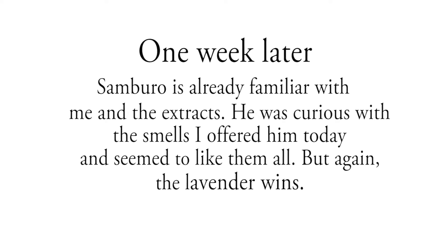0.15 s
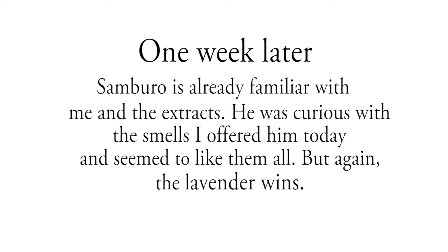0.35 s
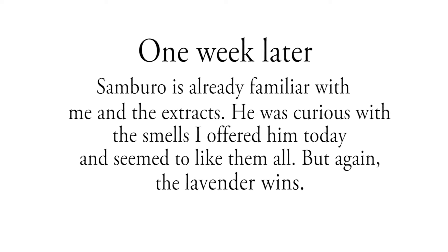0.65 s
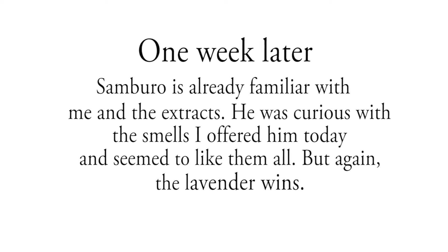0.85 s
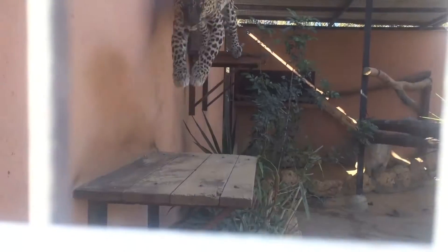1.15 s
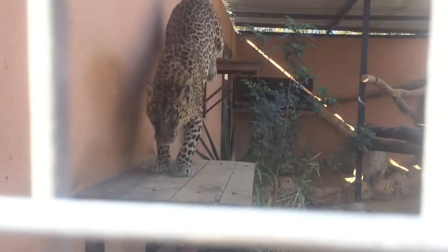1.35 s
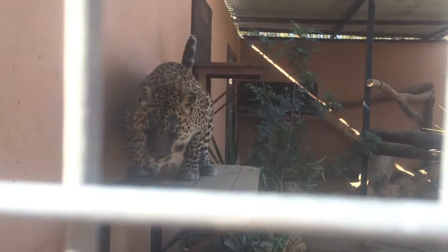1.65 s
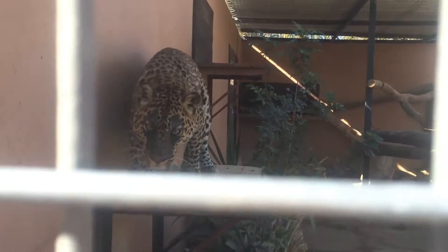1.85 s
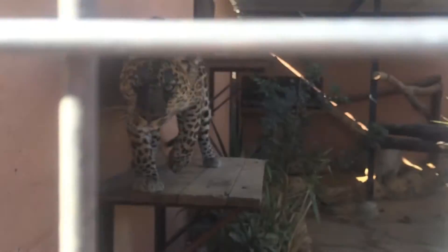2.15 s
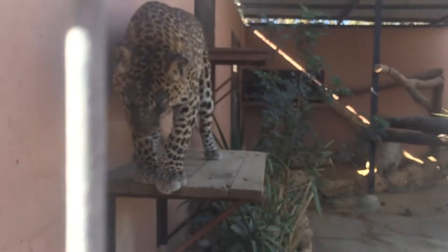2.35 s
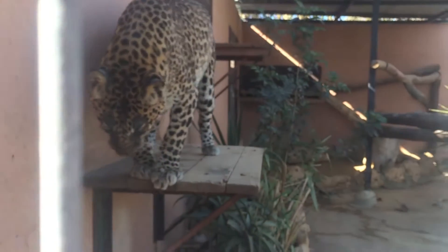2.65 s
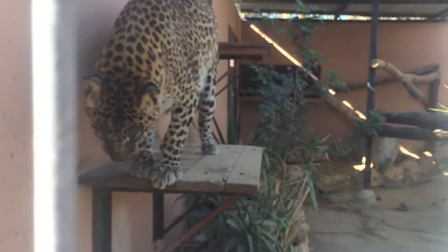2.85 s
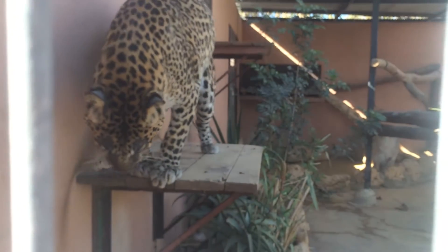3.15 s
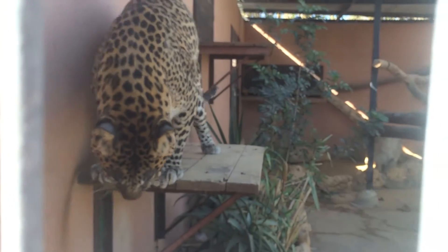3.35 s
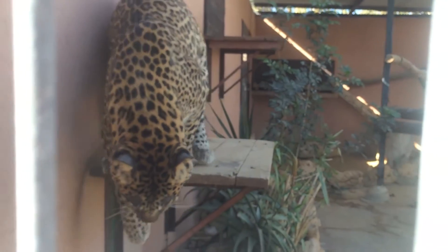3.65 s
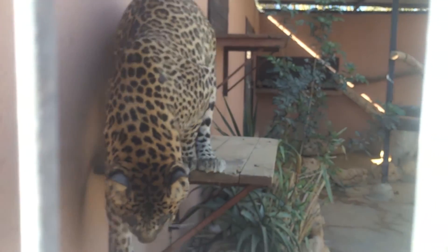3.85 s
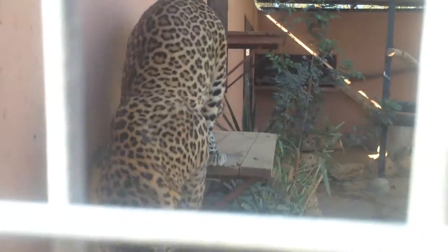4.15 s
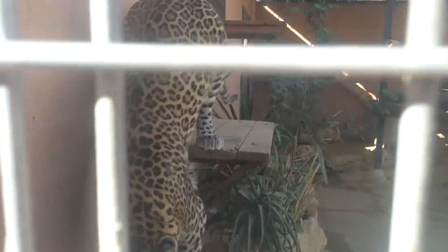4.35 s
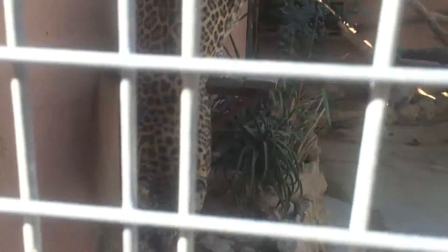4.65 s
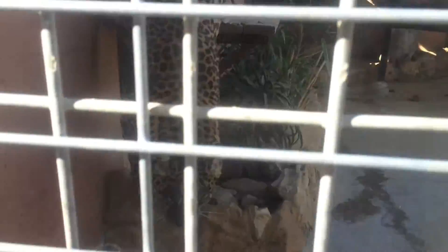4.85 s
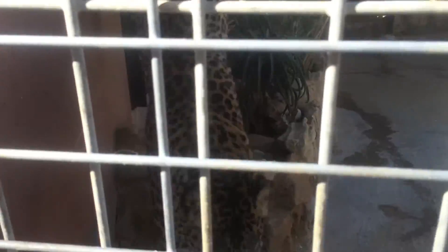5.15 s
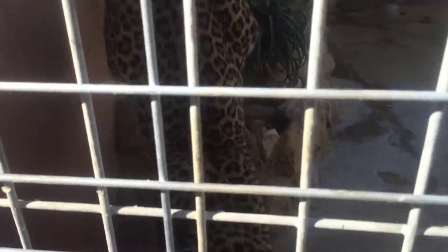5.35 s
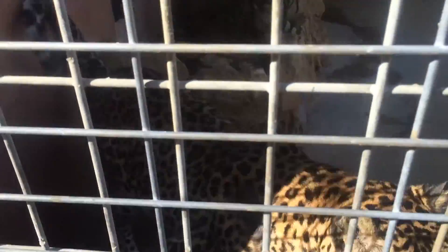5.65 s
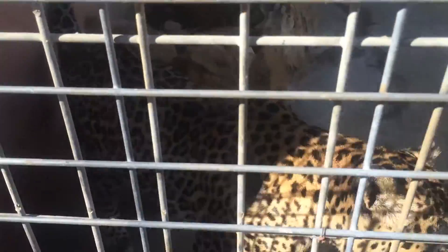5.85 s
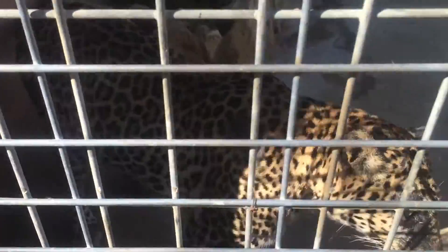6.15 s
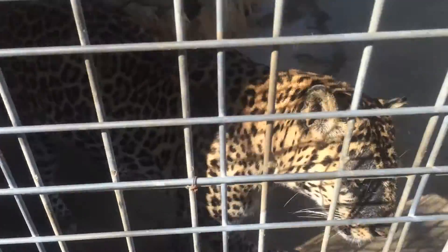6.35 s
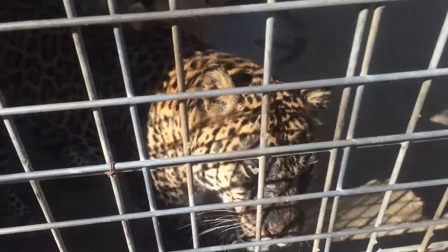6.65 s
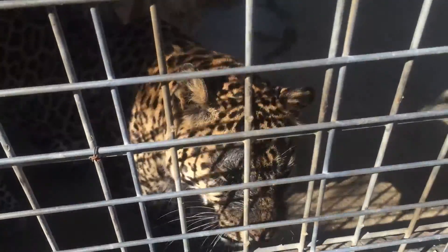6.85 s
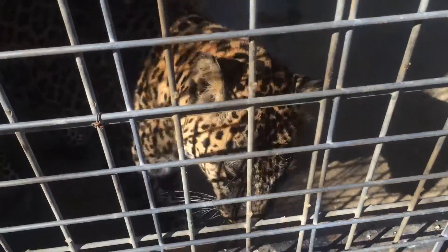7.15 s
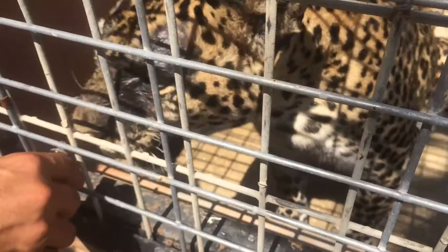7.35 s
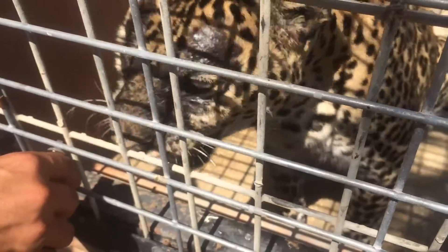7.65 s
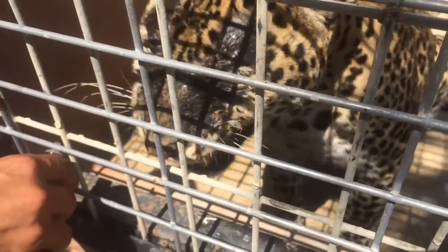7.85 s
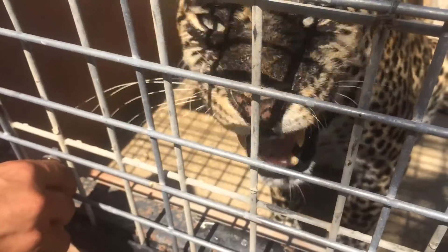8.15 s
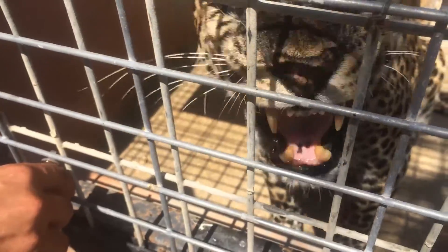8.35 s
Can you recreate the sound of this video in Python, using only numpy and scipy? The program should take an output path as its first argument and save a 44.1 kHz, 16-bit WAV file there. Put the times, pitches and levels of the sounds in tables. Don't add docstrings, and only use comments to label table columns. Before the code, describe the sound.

A big cat thumps onto a plank table in a walled pen amid sparrow chatter, then knocks at wire and gives a short breathy hiss.

```python
import sys
import numpy as np
from scipy import signal
from scipy.io import wavfile

SR = 44100
rng = np.random.default_rng(int(sys.argv[2]) if len(sys.argv) > 2 else 0)


def unload_audio(sound):
    columns = np.transpose(np.atleast_2d(sound))
    steps = np.round(np.clip(columns, -1, 1) * 32767)
    wavfile.write(sys.argv[1], SR, steps.astype(np.int16))


def gain_from_db(level_db):
    decades = np.asarray(level_db, float) / 20
    return 10 ** decades


N = 375279
SCENE_CHANGE_S = 6.961
GARDEN_FROM_S = 3.922


def rms_one(x):
    return x / np.sqrt(np.mean(x ** 2) + 1e-20)


def clock(length_s):
    return np.arange(int(length_s * SR)) / SR


def in_time(rows):
    s, *columns = np.transpose(rows)
    return [np.interp(np.arange(N) / SR, s, column) for column in columns]


def add(track, start_s, sound):
    i = round(start_s * SR)
    track[..., i:i + sound.shape[-1]] += sound[..., :N - i]


def band(x, low_hz, high_hz):
    edges = [low_hz, min(high_hz, 0.45 * SR)]
    return signal.sosfilt(signal.butter(2, edges, "band", fs=SR, output="sos"), x)


def low_pass(x, order, hz):
    return signal.sosfilt(signal.butter(order, hz, fs=SR, output="sos"), x)


def resonate(x, hz, width_hz):
    r = np.exp(-np.pi * width_hz / SR)
    poles = [1, -2 * r * np.cos(2 * np.pi * hz / SR), r * r]
    return signal.lfilter(np.array([1, 0, -1]) * (1 - r * r) / 2, poles, x)


def drift(rate, size):
    at = np.arange(size) * rate * np.pi / SR
    points = rng.standard_normal(int(at[-1]) + 2)
    return 1.2 * np.interp(at, np.arange(len(points)), points)


def coloured(spectrum, patchy_db):
    hz, db = np.transpose(spectrum)
    edges = np.geomspace(hz[0], hz[-1], int(2 * np.log2(hz[-1] / hz[0])) + 2)
    white = rng.standard_normal((2, N))
    out = 0
    for k, (low, high) in enumerate(zip(edges, edges[1:])):
        level_db = np.interp(np.log(low * high) / 2, np.log(hz), db)
        out = out + gain_from_db(level_db + patchy_db * drift(4.8, N)) * band(white[k % 2], low, high)
    return rms_one(out)


def swell(t, rise_s, t60_s):
    return np.minimum(t / rise_s, 1) * gain_from_db(-60 * np.maximum(t - rise_s, 0) / t60_s)


def echo(x, t60, wet_db):
    t = clock(1.2)
    response = rng.standard_normal(len(t)) * gain_from_db(-60 * t / t60) * np.minimum(t / 0.0021, 1)
    return gain_from_db(wet_db) * signal.fftconvolve(x, response / np.linalg.norm(response))[:N]


def pen_walls(x):
    return x + echo(x, t60=0.36, wet_db=-2.0)


def note(start_hz, end_hz, length_s, level_db, hoarse_hz, overtone_db):
    u = np.linspace(0, 1, int(length_s * SR) + 8)
    wobble = hoarse_hz * drift(500, len(u))
    phase = 2 * np.pi * np.cumsum(start_hz + (end_hz - start_hz) * u + wobble) / SR
    tone = np.sin(phase) + gain_from_db(overtone_db) * np.sin(2 * phase)
    return gain_from_db(level_db) * np.sin(np.pi * u) ** 0.35 * tone


def thud(low_hz, high_hz, rise_s, t60_s):
    t = clock(0.6)
    dull = signal.lfilter([1], [1, -0.9], rng.standard_normal(len(t)))
    return swell(t, rise_s, t60_s) * rms_one(band(band(dull, low_hz, high_hz), low_hz, high_hz))


# start_s, thump_hz, thump_db, plank_db, claw_scuff_db
PAW_LANDINGS = [(1.401, 249, -32, -21.5, -43.5), (1.406, 177, -8, -19.5, -44.5),
                (1.422, 283, -20, -30, -52), (1.451, 156, -24, -40, -74), (1.483, 170, -27.5, -56, -63),
                (1.592, 227.6, -21, -36.5, -50), (1.598, 197, -17, -30, -43.5),
                (1.606, 118.4, -13.5, -27, -42), (1.636, 199, -40, -48, -55),
                (1.654, 209, -33.5, -45.5, -80), (1.873, 636, -36.5, -34, -58), (1.884, 364, -33, -33, -53),
                (1.928, 89.5, -33.5, -58, -71)]
# pitch_hz, level_db, t60_s
FOREPAW_MODES = [(263, -3, 0.078), (345, -3, 0.094), (465, -16, .05), (570, -16, 0.043), (697, -6.5, 0.055),
                 (790, -21, 0.037), (1016, -14.5, 0.08), (1200, -31, .025), (1430, -20, .02),
                 (1700, -28, .018), (2450, -33, 0.011)]
# pitch_hz, level_db, t60_s
HIND_PAW_MODES = [(109, 5, 0.17), (207, -12, .15), (250, -4.5, 0.088), (334.3, -0.5, 0.23),
                  (487, -17, 0.11), (630, -31, .1), (826, -26, 0.17), (940, -33, 0.097), (1217, -33, .08),
                  (1685, -27, .08), (2180, -25, .03)]
# pitch_hz, level_db, t60_s
EDGE_MODES = [(255, -4, .06), (347, 1.5, 0.2), (475, -6.5, 0.054), (605, -9, 0.027), (782, -5.5, 0.043),
              (943, -16, 0.056), (1200, -37, .06), (1500, -38, .04), (1938, -25, .03), (2600, -17, .03)]
HIND_FROM_S, EDGE_FROM_S = 1.55, 1.8
CONTACT_S = 0.01243
LONGEST_RING_CYCLES = 48
RATTLE_DB, RATTLE_T60_S = -19, 0.16


def plank_table():
    out, t = np.zeros(N), clock(0.4)
    for start_s, thump_hz, thump_db, plank_db, scuff_db in PAW_LANDINGS:
        swing = np.exp(-((t / CONTACT_S - 1) / 0.5) ** 2) * np.sin(2 * np.pi * thump_hz * t)
        add(out, start_s, gain_from_db(thump_db) * swing)

        press = np.sin(np.pi * np.minimum(t / CONTACT_S, 1))
        jolts = press * band(rng.standard_normal(len(t)), 70, 1150)
        if start_s < HIND_FROM_S:
            modes = FOREPAW_MODES
        elif start_s < EDGE_FROM_S:
            modes = HIND_PAW_MODES
        else:
            modes = EDGE_MODES
        for hz, mode_db, t60_s in modes:
            damped_s = min(t60_s, LONGEST_RING_CYCLES / hz)
            ring = resonate(jolts, hz, np.log(1000) / np.pi / damped_s)
            add(out, start_s, gain_from_db(plank_db + mode_db) * ring / np.abs(ring).max())

        dull = signal.lfilter([1], [1, -0.93], rng.standard_normal(len(t)))
        rattle = band(dull, 210, 1700) * gain_from_db(3.6 * drift(44, len(t)))
        add(out, start_s, gain_from_db(plank_db + RATTLE_DB) * rms_one(rattle) * swell(t, 0.0068, RATTLE_T60_S))

        scuff = band(rng.standard_normal(len(t)), 1200, 12500)
        add(out, start_s, gain_from_db(scuff_db) * scuff * swell(t, 0.0097, 0.081))
    near_walls = band(echo(out, t60=0.32, wet_db=-8.5), 220, 5600)
    return out + near_walls + gain_from_db(-14.5) * echo(out, t60=0.45, wet_db=-2.5)


# start_s, level_db, front_cavity_hz, throat_db
HISS_COURSE = [
    (8.17, -57, 8480, -77),
    (8.185, -48, 8200, -46),
    (8.22, -38, 7900, -47.5),
    (8.28, -41, 6580, -47.5),
    (8.33, -45, 5900, -42),
    (8.41, -47.5, 6200, -45.5),
    (8.44, -55.5, 6040, -47.5),
    (8.51, -57, 5940, -53),
]
# pitch_hz, width_hz, level_db
THROAT_MODES = [(185, 84, 4.5), (298, 75, 6), (1080, 930, 3), (2170, 220, -6), (2950, 700, -1.5),
                (3900, 500, -7.5)]
# start_s, level_db
BREATH_PUFFS = [(8.188, 7), (8.2, 1), (8.22, 2), (8.233, 3), (8.281, 3), (8.296, 3), (8.357, 2), (8.405, 0)]
PUFF_S = 0.0024


def hiss():
    start = int(HISS_COURSE[0][0] * SR)
    level_db, front_hz, throat_db = (curve[start:] for curve in in_time(HISS_COURSE))
    size = N - start
    t = np.arange(start, N) / SR
    breath = rng.standard_normal(size) * gain_from_db(1.5 * drift(90, size))
    breath = breath * gain_from_db(sum(db * np.exp(-((t - s) / PUFF_S) ** 2) for s, db in BREATH_PUFFS))

    cavities = [(1.01, 1.12), (1.24, 0.91), (1.55, 0.6)]
    front = 0
    for hz in np.geomspace(5500, 13000, 26):
        near = sum(share * np.exp(-(np.log(front_hz * ratio / hz) / 0.12) ** 2) for ratio, share in cavities)
        clumps = gain_from_db(6.5 * drift(22, size))
        front = front + near * clumps * resonate(breath, hz, 210)
    shelf = 0.5 * band(band(breath, 3500, 14000), 3200, 13400) + 0.41 * band(breath, 2800, 6400)
    bright = low_pass(1.2 * front + shelf, 8, 13400)

    throat = 0
    for hz, width_hz, db in THROAT_MODES:
        throat = throat + gain_from_db(db) * rms_one(resonate(resonate(breath, hz, width_hz), hz, width_hz))
    return np.pad(gain_from_db(level_db - 5.0) * bright + gain_from_db(throat_db) * rms_one(throat), (start, 0))


# start_s, start_hz, end_hz, length_s, level_db
THROAT_MOANS = [
    (2.915, 159.5, 194.6, 0.15, -43.5),
    (3.076, 168, 193, 0.058, -37.5),
    (3.294, 73, 68, .03, -40.5),
    (3.3, 345, 340, 0.035, -58.5),
]


def moans():
    out = np.zeros(N)
    for start_s, *glide in THROAT_MOANS:
        add(out, start_s, note(*glide, hoarse_hz=29.9, overtone_db=-40))
    return pen_walls(out)


# start_s, level_db, middle_hz, t60_s
SOFT_GRUNTS = [(0.955, -35.5, 113, 0.22), (1.04, -36.5, 87, 0.4), (2.918, -44, 124, 0.58),
               (3.04, -45, 220, 0.4), (5.648, -37, 155, .078), (8.343, -40.5, 295, 0.092),
               (8.395, -40, 187, 0.069)]


def grunts():
    out, spread = np.zeros(N), 1.39
    for start_s, db, hz, t60_s in SOFT_GRUNTS:
        add(out, start_s, gain_from_db(db) * thud(hz / spread, hz * spread, 0.16 * t60_s, t60_s))
    return out


KNOCK_LOW_HZ, KNOCK_RISE_S = 170, 0.0039
# start_s, level_db, top_hz, t60_s
WOOD_AND_WIRE_KNOCKS = [(.877, -48.5, 900, 0.046), (.893, -43, 890, 0.026), (2.323, -49, 710, 0.02),
                        (4.189, -50.5, 1520, 0.12), (5.272, -36.5, 3520, 0.22), (5.294, -43.5, 497, 0.43),
                        (5.636, -36, 2560, 0.082), (5.649, -51, 1183, .027), (5.731, -40.5, 3530, 0.042),
                        (6.094, -55.5, 1200, 0.25), (8.173, -40.5, 1570, 0.022), (8.328, -33, 3200, 0.027),
                        (8.36, -60, 1800, 0.31)]


def knocks():
    out = np.zeros(N)
    for start_s, db, top_hz, t60_s in WOOD_AND_WIRE_KNOCKS:
        add(out, start_s, gain_from_db(db) * thud(KNOCK_LOW_HZ, top_hz, KNOCK_RISE_S, t60_s))
    return out


# start_s, pitch_hz, level_db, t60_s
WIRE_RINGS = [(8.349, 193, -30, 0.13), (7.5, 620, -51, 0.019), (5.651, 184, -42, 0.074),
              (8.328, 790, -38, 0.023), (8.349, 890, -38, .03), (8.352, 318, -37.5, 0.13),
              (8.401, 170, -41, .08), (8.476, 200, -44, 0.066)]


def wire_rings():
    out, t = np.zeros(N), clock(0.3)
    for start_s, hz, db, t60_s in WIRE_RINGS:
        add(out, start_s, gain_from_db(db - 60 * t / t60_s) * np.sin(2 * np.pi * hz * t))
    return out


# start_s, peak_db, pitch_hz
SHARP_PUSHES = [(3.6035, -20, 684), (5.636, -49, 1390), (5.651, -35, 510), (5.731, -37, 1400),
                (8.1725, -28, 1200), (8.193, -41, 600), (8.215, -41, 500), (8.296, -39, 800),
                (8.327, -23.5, 1450), (8.332, -33, 1200), (8.348, -29, 1100), (8.401, -36, 320)]


def taps():
    out = np.zeros(N)
    for start_s, db, hz in SHARP_PUSHES:
        cycles = np.arange(int(12 * SR / hz)) * hz / SR
        lead = np.exp(-((cycles - 1.6) / 0.7) ** 2)
        push = np.exp(-((cycles - 2.8) / 0.3) ** 2)
        rebound = np.exp(-((cycles - 4.4) / 1.03) ** 2)
        add(out, start_s, gain_from_db(db) * (0.24 * lead + push - 0.34 * rebound))
    return out


# level_db, low_hz, high_hz, length_s
BRIGHT_WASH = (-55, 5200, 12200, .12)


def bright_wash():
    db, low_hz, high_hz, length_s = BRIGHT_WASH
    u = (np.arange(N) / SR - SCENE_CHANGE_S) / length_s
    white = rng.standard_normal(N) * gain_from_db(2.5 * drift(60, N))
    grain = band(band(white, low_hz, high_hz), low_hz, high_hz) + 2.2 * resonate(white, 6000, 900)
    return gain_from_db(db) * rms_one(grain) * (u > 0) * np.exp(-np.maximum(u, 0) ** 3)


# level_db, low_hz, high_hz, t60_s
DYING_HUM = (-58.5, 997, 1202, 2.2)


def dying_hum():
    out = np.zeros(N)
    db, low_hz, high_hz, t60_s = DYING_HUM
    add(out, SCENE_CHANGE_S, gain_from_db(db) * thud(low_hz, high_hz, KNOCK_RISE_S, t60_s))
    return out


# delay_s, start_hz, end_hz, length_s, level_db
CHEEP_SHAPE = [
    (0, 5400, 6100, .03, -9.5),
    (.03, 3900, 3300, .065, -1),
    (.085, 3130, 2500, .045, -6),
]
CHIRRUP_SHAPE = [
    (0, 5950, 7750, 0.054, -16),
    (.045, 4310, 4950, .05, -2),
    (.07, 4600, 4190, 0.059, -2.5),
    (.105, 5230, 6400, .04, -15),
    (.152, 3730, 4350, .07, -1.5),
]
# start_s, pitch_factor, time_stretch, level_db
CHEEP_CALLS = [(.258, 0.98, 1.12, -38.5), (.622, 0.96, 0.81, -53.5), (4.119, 1, .85, -37.5),
               (4.814, 0.96, 1.27, -43)]
CHIRRUP_CALLS = [(2.477, 0.99, .98, -41), (3.73, 1, 1.05, -45)]
# start_s, middle_hz, length_s, level_db
FALLING_SLURS = [(0, 3560, 0.014, -52.5), (.15, 4060, 0.043, -56), (0.174, 4370, 0.053, -54),
                 (0.199, 3270, 0.061, -49.5), (0.452, 4430, 0.064, -60.5), (0.493, 3250, 0.058, -53),
                 (0.644, 4160, .06, -63.5), (0.775, 3520, 0.046, -55), (1.036, 3480, 0.044, -61),
                 (1.334, 2950, 0.042, -55), (1.333, 4070, 0.038, -57), (3.97, 3200, .04, -52),
                 (0.48, 3380, .04, -53.5), (0.963, 5000, .02, -56.5), (1.128, 4360, 0.055, -60),
                 (1.19, 2850, 0.061, -56), (1.252, 4250, 0.058, -49), (1.655, 3530, 0.023, -59),
                 (2.07, 4720, 0.12, -59.5), (2.133, 3350, 0.15, -56.5), (2.357, 4260, 0.054, -52.5),
                 (2.404, 2930, 0.077, -56), (2.805, 4140, 0.013, -50), (3.245, 3200, 0.1, -56),
                 (3.419, 3830, 0.16, -53), (3.555, 4056, 0.094, -49.5), (3.619, 3270, 0.077, -51.5),
                 (6.354, 5130, 0.034, -62), (6.548, 5330, 0.028, -79), (6.634, 5200, 0.02, -73)]
RISING_SLURS = [(.84, 3400, 0.058, -54), (.895, 3850, 0.089, -58), (.925, 5370, 0.022, -73),
                (1.11, 4400, 0.077, -67), (4.065, 5570, 0.061, -61), (4.108, 3100, 0.013, -51),
                (1.919, 3900, 0.13, -60), (2.983, 3380, 0.073, -57), (3.16, 4400, 0.027, -53.5),
                (3.879, 3660, 0.0566, -48), (4.122, 4870, 0.051, -38.5), (5.744, 3930, 0.051, -53),
                (5.844, 3040, .05, -54.5), (5.86, 4770, 0.035, -50.5)]
FALL_HZ_PER_S, RISE_HZ_PER_S = 7000, 5420
# start_s, start_hz, end_hz, length_s, level_db
QUICK_FLICKS = [(0.614, 5200, 7000, .03, -66), (0.658, 4700, 3500, 0.036, -59.5),
                (2.59, 5200, 7060, .02, -60), (3.13, 5670, 5750, 0.043, -68),
                (3.23, 2320, 2910, 0.026, -60), (4.818, 5930, 7480, 0.0154, -53),
                (4.84, 5120, 4000, .012, -41), (4.892, 3400, 2330, .055, -47)]


def sparrow_notes():
    notes = list(QUICK_FLICKS)
    for shape, calls in [(CHEEP_SHAPE, CHEEP_CALLS), (CHIRRUP_SHAPE, CHIRRUP_CALLS)]:
        for s, pitch, stretch, db in calls:
            for delay, start_hz, end_hz, length, note_db in shape:
                notes.append((s + stretch * delay, pitch * start_hz, pitch * end_hz, stretch * length, db + note_db))
    for glide, slurs in [(-FALL_HZ_PER_S, FALLING_SLURS), (RISE_HZ_PER_S, RISING_SLURS)]:
        for s, hz, length, db in slurs:
            notes.append((s, hz - glide * length / 2, hz + glide * length / 2, length, db))
    return notes


def sparrows():
    out = np.zeros(N)
    for start_s, start_hz, end_hz, length_s, db in sparrow_notes():
        blur_hz = 170 + 18 * max(-44 - db, 0)
        add(out, start_s, note(start_hz, end_hz, length_s, db, blur_hz, overtone_db=-25.0))
    return pen_walls(out)


# start_s, level_db
FLOCK_LEVEL = [(0.0, -82), (0.21, -62.5), (0.36, -52), (0.6, -61.5), (1.39, -56.5), (1.62, -67.5),
               (2.58, -55.5), (3.3, -59.5), (4.06, -57), (4.17, -47.5), (4.45, -57.5), (4.73, -52.5),
               (5.15, -53.5), (5.61, -58), (6.04, -53.5), (6.255, -56), (6.275, -70)]


def far_flock():
    out = np.zeros(N)
    for when, pitch, fall, span, size in rng.random((700, 5)):
        hz = 2900 + 2200 * pitch ** 1.5
        end_hz = hz * (1.1 - 0.4 * fall)
        slur = note(hz, end_hz, 0.03 + 0.06 * span, 3.8 * size, hoarse_hz=168.0, overtone_db=-21.0)
        add(out, when * N / SR, slur)
    smeared = band(out + echo(out, t60=0.6, wet_db=1), 2650, 5900)
    return gain_from_db(in_time(FLOCK_LEVEL)[0]) * rms_one(smeared)


# start_s, start_hz, end_hz, length_s, level_db
DOVE_COOS = [
    (7.575, 606, 581, 0.025, -58),
    (7.662, 582, 570, 0.034, -59),
    (7.74, 536, 497, 0.065, -61),
    (7.813, 423, 383, 0.045, -61),
    (7.874, 502, 585, 0.19, -61.5),
    (8.074, 295, 316, 0.066, -51),
]


def dove():
    out = np.zeros(N)
    for start_s, *glide in DOVE_COOS:
        add(out, start_s, note(*glide, hoarse_hz=40.3, overtone_db=-14))
    return pen_walls(out)


# delay_s, start_hz, end_hz, length_s, level_db
LIFT = [
    (0, 3950, 5260, 0.016, -6),
    (.011, 5330, 5370, 0.011, -2),
    (.026, 5300, 3950, .028, 2.5),
]
STAIR = [
    (0, 4620, 4490, 0.01, 1.03),
    (.023, 3925, 3950, 0.023, 2),
    (.042, 3550, 3350, .05, 0.5),
    (.075, 2945, 2600, 0.02, 1),
]
TUMBLE = [
    (0, 5940, 5420, 0.016, -15),
    (.03, 4094, 3985, 0.048, -4.5),
    (.055, 3420, 3350, .05, 0),
    (.082, 3100, 2880, 0.0483, -1),
]
# start_s, time_stretch, level_db, swell_db (first to last note), pan_db (left minus right)
LIFTS = [(4.482, 0.97, -41, 2.5, -5.5)]
STAIRS = [(3.927, .55, -48, -14, 11.6), (4.596, 0.8, -43, -13, 3)]
TUMBLES = [(5.958, 1.04, -45, -2.5, 6.5), (8.089, 0.96, -48, -20, -4)]
# delay_s, start_hz, end_hz, length_s, level_db
CLIPPED = [(0, 4520, 4410, 0.011, 5), (.016, 3950, 3790, 0.014, 2), (.028, 2930, 2904, 0.031, 1.5),
           (.035, 3490, 3476, 0.034, 1), (.082, 2940, 2700, 0.0087, -3), (.172, 4400, 4680, .04, -12),
           (.198, 3650, 3550, 0.0276, -5), (.25, 3410, 3060, 0.021, -6.5)]
DROP = [(0, 4450, 4340, 0.019, -5.5), (.024, 3900, 3970, 0.033, -5), (.04, 3520, 3320, 0.025, -5),
        (.03, 2930, 2980, 0.019, -10), (.05, 4600, 4180, .014, -3), (.072, 3400, 3330, .018, 5.5),
        (.074, 3060, 2410, 0.0173, 2), (.085, 3950, 3870, .035, 0)]
LONG = [(.004, 4000, 5400, 0.013, -3), (.012, 5500, 5100, 0.024, 1), (.031, 5300, 3900, 0.0115, -3),
        (.04, 3430, 3440, 0.1, -2), (.072, 3950, 4460, 0.0154, 0), (.118, 3980, 3980, 0.02, 2.5),
        (.13, 3700, 3300, .03, 2), (.165, 3454, 3236, 0.022, 1.5), (.182, 3070, 2644, 0.0195, 1)]
# start_s, time_stretch, level_db, swell_db, pan_db
PHRASES = [
    (CLIPPED, [(5.325, 0.87, -47, 0.0061, 7.1)]),
    (DROP, [(6.768, 0.82, -49, 0, 6.8)]),
    (LONG, [(7.307, 1.0, -44, 0, 1)]),
]
# start_s, start_hz, end_hz, length_s, level_db
LOOSE_WHISTLES = [(4.46, 4650, 4800, 0.033, -56), (4.555, 5700, 6540, 0.023, -47),
                  (4.583, 3800, 4630, 0.0098, -35), (4.6, 3980, 3980, .03, -42),
                  (4.649, 3370, 2690, 0.027, -41.5), (5.037, 2270, 2110, 0.032, -61),
                  (6.286, 5870, 5600, 0.012, -60), (6.318, 4130, 4040, 0.018, -51),
                  (6.333, 3170, 3720, 0.028, -50.5), (6.37, 3360, 2887, 0.029, -42.5),
                  (6.398, 2895, 2875, 0.023, -43.5), (6.4, 4100, 4080, 0.022, -61),
                  (6.067, 2924, 2526, 0.019, -43), (8.246, 3440, 3016, 0.0152, -39),
                  (8.263, 3166, 2450, 0.0136, -39)]


def song_notes():
    notes = [(*row, 1.5) for row in LOOSE_WHISTLES]
    for motif, times in [(LIFT, LIFTS), (STAIR, STAIRS), (TUMBLE, TUMBLES)] + list(PHRASES):
        last_delay = motif[-1][0]
        for s, stretch, db, swell_db, pan_db in times:
            for delay, start_hz, end_hz, length, note_db in motif:
                level_db = db + note_db + swell_db * (delay / last_delay - 0.5)
                notes.append((s + stretch * delay, start_hz, end_hz, stretch * length, level_db, pan_db))
    return notes


EAR_LAG_S = 0.00002


def songbird():
    song = np.zeros((2, N))
    for start_s, start_hz, end_hz, length_s, db, pan_db in song_notes():
        whistle = note(start_hz, end_hz, length_s, db, hoarse_hz=100, overtone_db=-42)
        add(song, start_s, whistle * gain_from_db([[pan_db / 2], [-pan_db / 2]]))
    song[1] = -np.interp(np.arange(N) - EAR_LAG_S * SR, np.arange(N), song[1])
    wet = []
    for side in song:
        far_side = band(band(side, 2000, 5570), 2000, 5700)
        wet.append(echo(side, t60=0.31, wet_db=0.5) + echo(far_side, t60=1.05, wet_db=2.0))
    return song + np.array(wet)


# start_s, level_db
GUST_LEVEL = [(3.92, -36.5), (4.06, -30.5), (4.52, -47.5), (4.86, -26), (5.31, -44.5), (5.73, -24.5),
              (5.95, -34.5), (7.96, -30), (8.51, -41)]


def gusts():
    ports = []
    for _ in range(2):
        white = rng.standard_normal(N)
        ports.append(rms_one(band(band(band(white, 1.75, 15.1), 2.67, 24.7), 5.77, 30.6)))
    left, right = ports
    return gain_from_db(in_time(GUST_LEVEL)[0] - 3.5) * np.array([left, 0.2 * left + 0.5 * right])


# pitch_hz, level_db (per Hz)
GARDEN_SPECTRUM = [(30, -19), (60, -16), (130, -31), (500, -35), (800, -41), (1100, -31.5), (1400, -46),
                   (2000, -44), (2400, -34)]


def garden_drone():
    return gain_from_db(-69.5) * np.array([coloured(GARDEN_SPECTRUM, patchy_db=7.0) for _ in range(2)])


def garden():
    return (songbird() + garden_drone() + gusts()) * (np.arange(N) > GARDEN_FROM_S * SR)


# start_s, level_db
STIR_LEVEL = [(0, -64.5), (3.7, -62), (4.2, -63), (5.2, -63), (5.35, -57.5), (5.6, -63), (6.05, -62),
              (6.26, -60), (6.27, -64), (6.955, -67), (6.965, -56.5), (7.4, -62.5), (8.51, -61)]
# rustle_db, growth_db_per_s, drone_over_air_db
STAGE_LEVELS = [
    (-74, 1.45, -9.5),
    (-65, -2.2, -1),
    (-73.5, -5, -0.5),
    (-71.5, 0.1, 2),
]
STAGE_STARTS = [0, 5.27, 6.265, 6.96]


def pen_levels():
    t, air_db = np.arange(N) / SR, in_time(STIR_LEVEL)[0]
    stage = np.searchsorted(STAGE_STARTS[1:], t)
    rustle_db, growth, drone_db = np.transpose(STAGE_LEVELS)[:, stage]
    return air_db, rustle_db + growth * (t - np.array(STAGE_STARTS)[stage]), air_db + drone_db


# start_s, level_db, rise_s, t60_s
DRY_SCUFFS = [(.17, -62, 0.0054, 0.055), (.27, -65, 0.011, 0.16), (2.56, -64, .03, 0.18),
              (3.78, -63, 0.013, 0.23), (3.88, -74, .04, .3), (4.108, -63, 0.012, 0.24),
              (4.82, -67, .01, 0.16), (5.273, -49, 0.0023, 0.054), (5.375, -52.5, 0.0087, 0.049),
              (5.637, -48, 0.0013, 0.07), (5.734, -51.5, 0.013, 0.095), (5.89, -55, 0.02, 0.12),
              (6.09, -68, 0.0089, 0.045), (6.175, -65, 0.0055, 0.22), (5.387, -51, 0.0015, 0.026),
              (5.651, -35.5, 0.0015, 0.023), (7.945, -66, 0.0065, 0.037), (5.18, -70, .004, 0.028),
              (5.214, -75, 0.0036, 0.018), (8.174, -58, .002, .02), (6.962, -58, .001, .03)]
# pitch_hz, level_db (per Hz)
RUSTLE_SPECTRUM = [(2000, -27), (4000, 4), (6500, 7), (10000, 5), (13500, 4), (15700, -20)]


def dry_rustle(rustle_db):
    flare, t = gain_from_db(rustle_db), clock(0.6)
    for start_s, db, rise_s, t60_s in DRY_SCUFFS:
        add(flare, start_s, gain_from_db(db) * swell(t, rise_s, t60_s))
    return gain_from_db(1.5) * flare * coloured(RUSTLE_SPECTRUM, patchy_db=0.3)


# pitch_hz, level_db (per Hz)
AIR_SPECTRUM = [(150, -12), (350, 0), (750, -1.5), (980, 0.5), (1500, -4.5), (2300, -6), (4500, -9),
                (7000, -12.5), (9000, -30)]


def pen_air(air_db):
    return gain_from_db(air_db + 0.5) * coloured(AIR_SPECTRUM, patchy_db=2.3)


def pen_drone(drone_db):
    return gain_from_db(drone_db + 3.1 * drift(9.3, N)) * rms_one(band(rng.standard_normal(N), 91, 243))


# start_s, level_db
RUMBLE_LEVEL = [(0.0, -55), (0.45, -57.5), (0.95, -55), (1.07, -41), (1.44, -60.5), (1.82, -48),
                (2.05, -56.5), (2.32, -51.5), (2.63, -60), (2.82, -55), (3.32, -62.5), (4.15, -59.5),
                (4.36, -66.5), (4.79, -55.5), (5.07, -62), (6.87, -59.5), (7.18, -57), (8.51, -57.5)]
# pitch_hz, level_db (per Hz)
RUMBLE_SPECTRUM = [(15, -17), (25, -31), (59, 11.5), (89, -2.5), (114, 7.5), (177, -25), (300, -53),
                   (390, -54), (660, -120)]


def far_rumble():
    return gain_from_db(in_time(RUMBLE_LEVEL)[0] + 5.0) * coloured(RUMBLE_SPECTRUM, patchy_db=1.5)


def scene():
    air_db, rustle_db, drone_db = pen_levels()
    cat = plank_table() + hiss() + moans() + grunts()
    contacts = knocks() + wire_rings() + taps() + bright_wash() + dying_hum()
    birds = sparrows() + far_flock() + dove()
    background = dry_rustle(rustle_db) + pen_air(air_db) + pen_drone(drone_db) + far_rumble()
    return cat + contacts + birds + background + garden()


def top_cut(x):
    return signal.sosfilt(signal.butter(12, 16360, fs=SR, output="sos"), x)


def record(dry):
    pen_alone = low_pass(dry, 12, 14500)
    with_garden = low_pass(dry, 12, 14900)
    mix = np.where(np.arange(N) < GARDEN_FROM_S * SR, pen_alone, with_garden)
    return top_cut(mix)


dry = scene()
out = record(dry)
unload_audio(out)
```